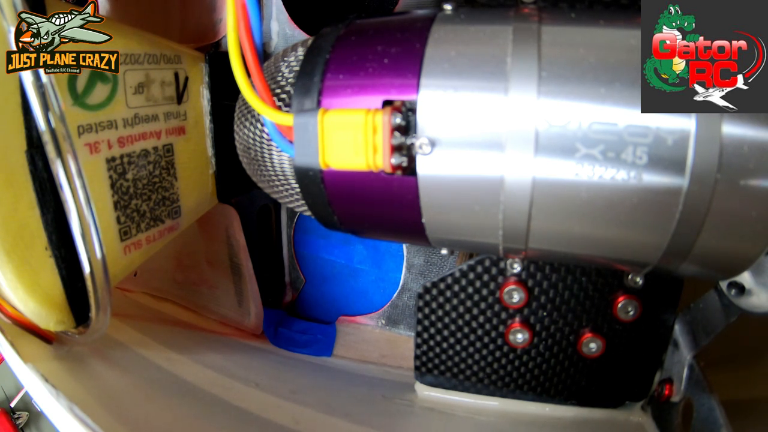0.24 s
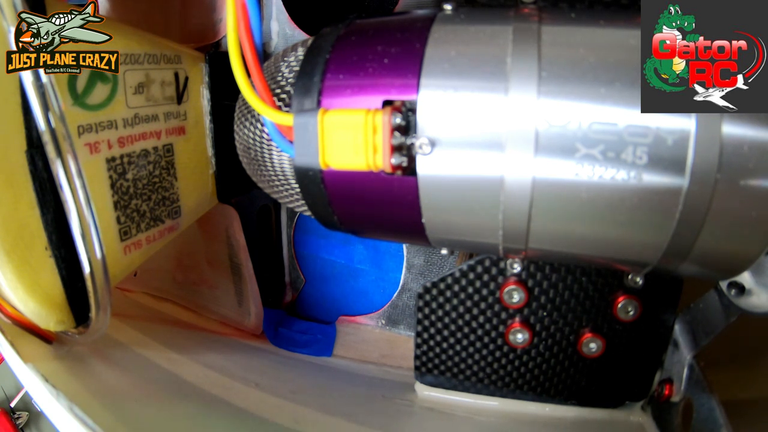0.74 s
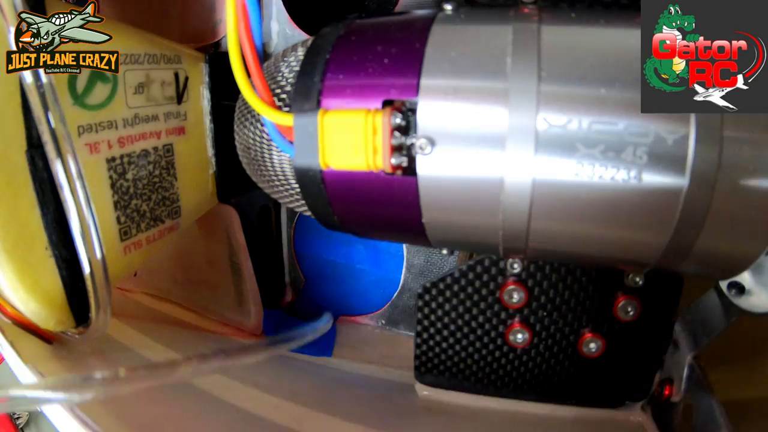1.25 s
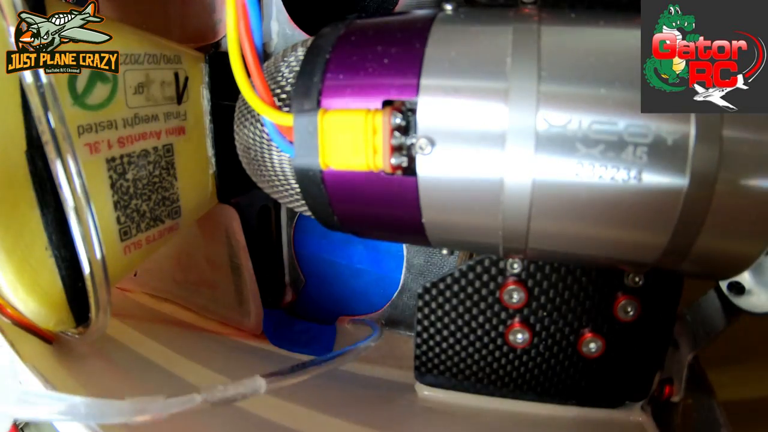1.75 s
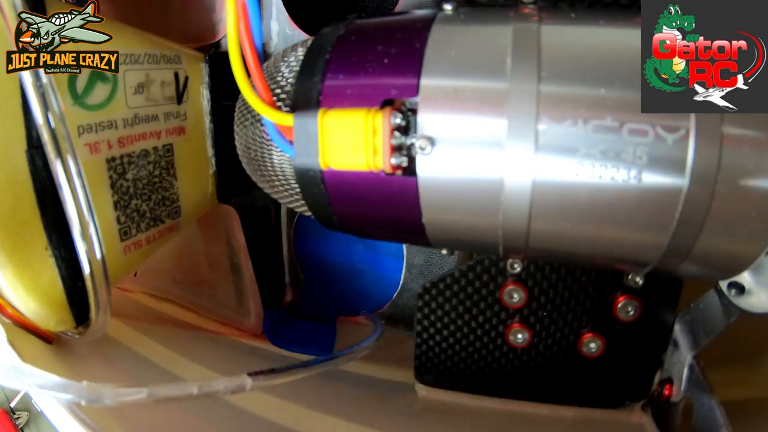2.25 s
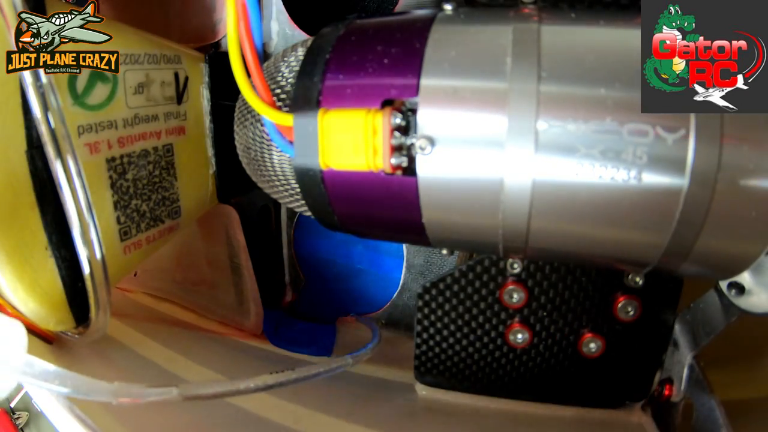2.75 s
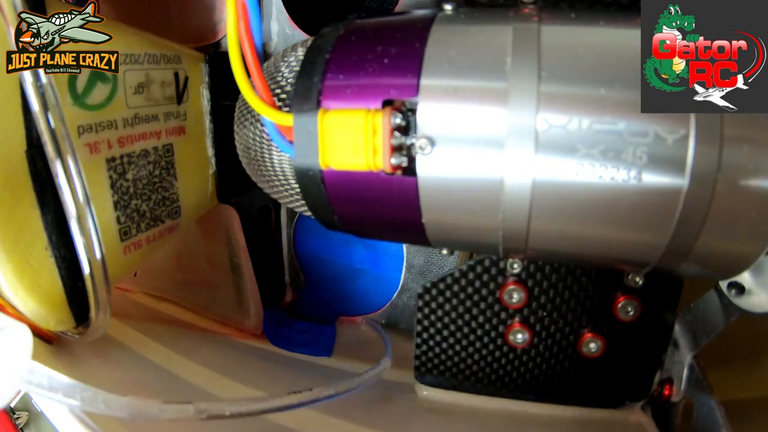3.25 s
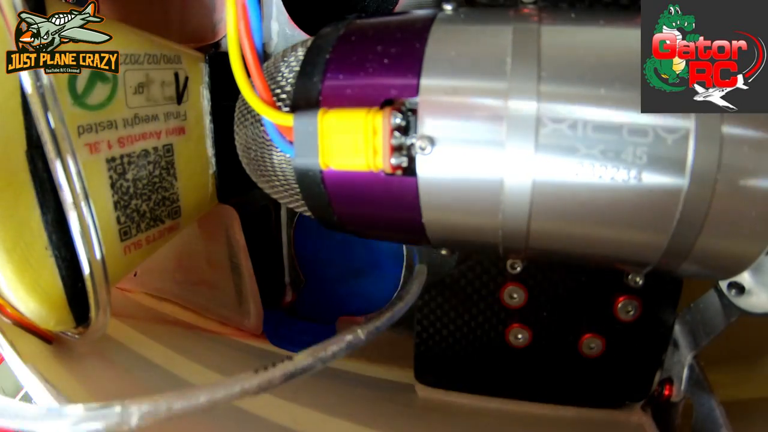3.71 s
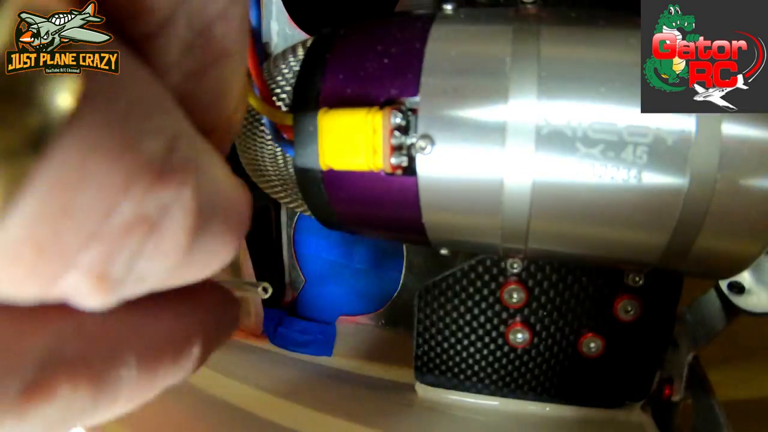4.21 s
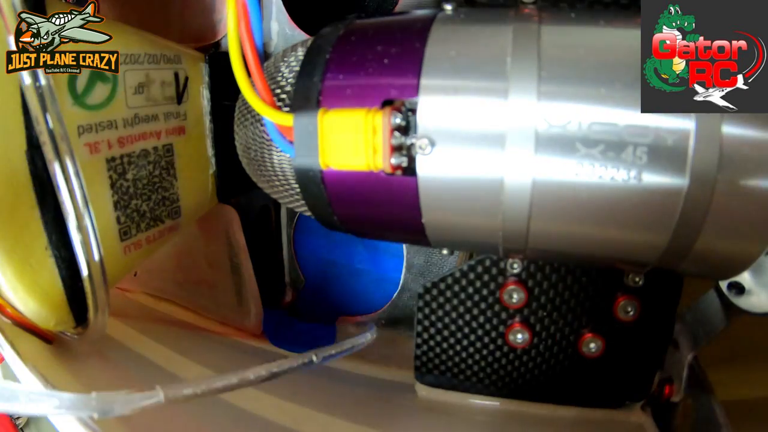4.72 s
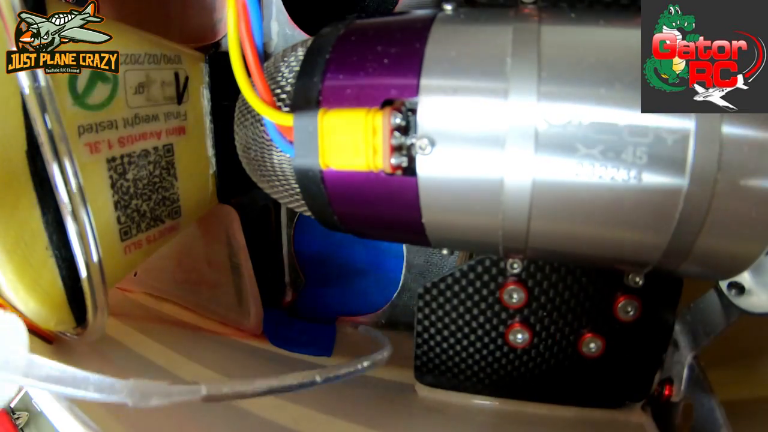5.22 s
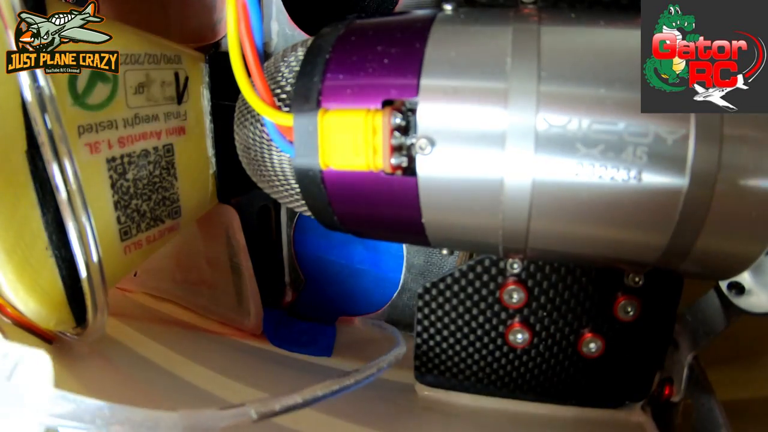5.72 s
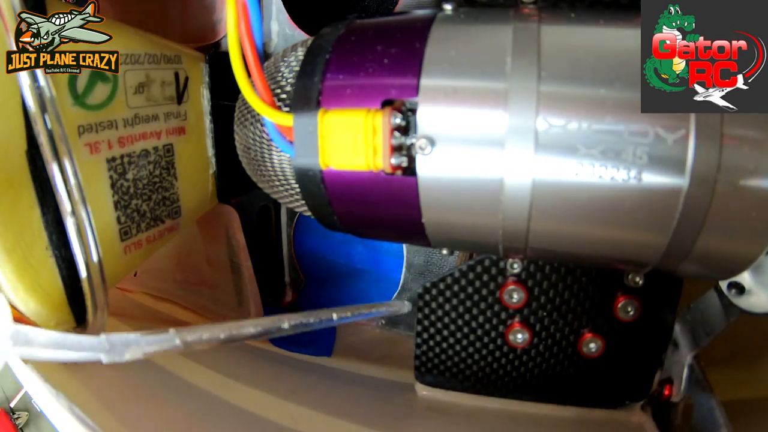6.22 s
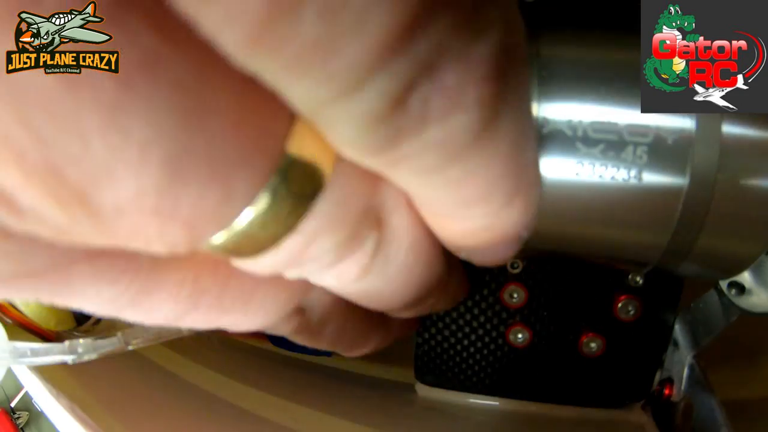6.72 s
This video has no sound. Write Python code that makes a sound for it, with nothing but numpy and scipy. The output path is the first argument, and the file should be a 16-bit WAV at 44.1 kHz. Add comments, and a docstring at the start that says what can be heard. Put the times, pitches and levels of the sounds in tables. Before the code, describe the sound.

Very close inside a hollow model aircraft body, a hand feeds a stiff plastic tube past parts. After a nearly silent first second, sharp clicks and short rattles come in irregular clusters, ringing the thin shell. Brief gritty scrapes join them, with low hand thuds later. A hard knock and dense rattle end it. Faint room hiss and an electric whine swell in the middle and at the end.

```python
"""Tube fed through a hollow model aircraft

Inside the body of a model aircraft, microphones sit close to a stiff plastic tube that a hand feeds through.
The tube slips and ticks over edges: jolts and rattles ring the thin shell and scatter in the hollow.
Skin and tube rub in strokes of tiny catches; the hand bumps the frame in soft thuds of tone and low noise.
Behind them, patchy room noise and a faint electric whine of three tones share one level that rises and falls."""
import sys
import numpy as np
from scipy import signal
from scipy.fft import rfft, irfft, next_fast_len
from scipy.io import wavfile
from scipy.ndimage import uniform_filter1d, map_coordinates

SR = 44100
rng = np.random.default_rng(int(sys.argv[2]) if len(sys.argv) > 2 else 0)


def log_audio(samples):
    """Write samples as a 16-bit WAV file to the path given in sys.argv[1]."""
    # one column per channel
    frames = np.atleast_2d(samples).T
    # limit to full scale, then quantise
    limited = np.clip(frames, -1, 1)
    pcm = np.round(limited * 32767).astype(np.int16)
    wavfile.write(sys.argv[1], SR, pcm)


N = 306936

# background level as heard at the microphones: start_s [s], level_db [dB]
ROOM_LEVEL = [(0.0, -69), (3.97, -63.5), (4.15, -56.5), (4.57, -58), (5.66, -66.5), (6.2, -67),
              (6.96, -55.5)]
# colour of the room noise, mid: frequency_hz [Hz], density_db [dB per Hz, relative]
ROOM_MID_COLOUR = [(30, -43.5), (100, -43.5), (174, -29.5), (290, -18), (350, -25.5), (415, -20.5),
                   (500, -19.5), (590, -16), (900, -12), (1250, -10.5), (1590, -0.5), (2200, -13.5),
                   (3500, -25), (5500, -36.5), (7600, -26), (10000, -34.5), (16000, -38.5)]
# colour of the room noise, side: frequency_hz [Hz], density_db [dB per Hz, relative]
ROOM_SIDE_COLOUR = [(18, -60.5), (30, -38), (295, -17.5), (374, -26), (584, -6.5), (1130, -24), (1540, 7),
                    (4300, -10), (6380, 0), (10200, -6.5), (13000, -12), (16000, -20)]
# tones of the electric whine: pitch_hz [Hz], level_db [dB against the background level]
WHINE_TONES = [(415, -10), (600, -14.5), (1200, 2.5)]
# soft bumps of the hand on the frame: start_s [s], level_db [dB], pitch_hz [Hz]
HAND_BUMPS = [(.469, -56, 453), (0.534, -68, 202), (0.572, -58.5, 734), (0.601, -49.5, 387),
              (.745, -55, 1470), (0.754, -48, 885), (.77, -61, 945), (1.076, -50.5, 1275),
              (1.851, -57.5, 273), (1.937, -50, 298), (3.577, -59, 418), (4.186, -40, 350),
              (4.262, -40.5, 396), (4.384, -38, 425), (4.404, -44.5, 306), (4.834, -41.5, 433),
              (4.953, -43, 439), (5.069, -34, 566), (5.092, -36, 300), (5.133, -39, 416), (5.161, -43, 302),
              (5.862, -58, 220), (5.92, -55, 252), (5.99, -58, 660), (6.192, -60, 980), (6.26, -56, 402),
              (6.272, -51.5, 94), (6.382, -56.5, 230), (6.445, -60, 232), (6.576, -23.5, 890),
              (6.59, -31, 500), (6.672, -34.5, 910), (6.685, -47.5, 298), (6.926, -44.5, 376)]
# strokes of tube and hand: start_s [s], length_s [s], scrape_db [dB], rustle_db [dB], hand_db [dB]
STROKES = [(1.464, 0.051, -56.5, -66, -64.5), (1.841, 0.13, -61.5, -62, -70),
           (2.135, 0.17, -47.5, -66, -61), (2.324, 0.067, -49, -95, -59), (2.773, 0.11, -72, -77, -79),
           (3.155, 0.17, -46, -66.5, -60), (3.524, 0.1, -57.5, -76, -81), (3.959, 0.13, -48.5, -69, -60),
           (4.163, 0.14, -46.5, -63.5, -46.5), (4.339, 0.083, -44.5, -55, -54), (4.482, .22, -66, -71, -63),
           (4.728, 0.27, -70, -75.5, -61.5), (5.05, 0.1, -47.5, -64, -45), (5.187, 0.14, -55.5, -69, -66),
           (5.551, 0.33, -72, -84, -75.5), (6.161, 0.19, -65, -91, -68.5),
           (6.621, 0.17, -41.5, -56.5, -49.5), (6.846, 0.11, -55.5, -79, -59)]
# light contact that never stops: scrape_db, rustle_db, hand_db [dB]
REST_DB = [-74.5, -84.5, -79.5]
# slips of the tube: start_s [s], shell_db [dB], tick_db [dB, treble], length_s [s]
TUBE_SLIPS = [(0.4404, -55.5, -46, 0.0017), (0.9442, -55.5, -55, 0.00058), (1.0245, -47.5, -49, 0.00043),
              (1.3078, -48, -37, 0.00057), (1.3187, -47.5, -39, 0.00039), (1.334, -60, -50, 0.00044),
              (1.344, -58, -39, 0.0005), (1.354, -17.5, -40.5, 0.00056), (1.3624, -50, -49, 0.0014),
              (1.38, -59.5, -52, 0.00046), (1.393, -63, -53, 0.0005), (1.4329, -28, -43, 0.0005),
              (1.4398, -26, -44.5, 0.0009), (1.452, -23, -46, 0.0005), (1.487, -36, -62, 0.0016),
              (1.499, -35, -61, 0.0013), (1.51, -30, -57, 0.00054), (1.519, -28, -45, 0.001),
              (1.524, -34, -51, 0.0021), (1.5363, -19, -45, 0.0006), (1.633, -43, -38, 0.00037),
              (1.702, -49.5, -55, 0.0008), (1.749, -50, -53, 0.0008), (1.801, -40, -62, 0.0007),
              (1.814, -27.5, -50, 0.00092), (1.8185, -22, -39.5, 0.0032), (1.829, -34.5, -53, 0.0013),
              (1.855, -50, -55, 0.0005), (1.866, -47, -57, 0.0009), (1.883, -47.5, -60, 0.00045),
              (1.898, -55, -42, 0.0005), (1.915, -53.5, -56, 0.0007), (1.9213, -58, -45, 0.0023),
              (1.9325, -46, -45, 0.0011), (1.944, -62, -44, 0.0013), (1.986, -65, -42, 0.0016),
              (2.0074, -65, -42.5, 0.00056), (2.068, -74, -50.5, 0.00043), (2.0892, -23, -47, 0.00046),
              (2.1013, -13.5, -40.5, 0.00063), (2.1184, -14, -37.5, 0.0018), (2.1604, -28, -48, 0.0021),
              (2.1876, -28, -63, 0.0021), (2.196, -33, -56, 0.0049), (2.219, -41.5, -61, 0.0028),
              (2.234, -37, -63, 0.002), (2.2587, -38.5, -56, 0.0025), (2.3172, -36, -62, 0.00078),
              (2.3306, -33, -55, 0.0031), (2.3478, -17, -42, 0.00046), (2.372, -19.5, -46, 0.0005),
              (2.4005, -25.5, -56, 0.0005), (2.417, -22.5, -52, 0.00043), (2.4895, -33, -69, 0.001),
              (2.5186, -31.5, -78, 0.0016), (2.5316, -20, -50, 0.00042), (2.5476, -23, -55, 0.00061),
              (2.5547, -27.5, -62, 0.0018), (2.5803, -25.5, -47, 0.0005), (2.593, -26, -82, 0.00043),
              (2.607, -24, -66, 0.00073), (2.6209, -28, -49.5, 0.0005), (2.6443, -37.5, -75, 0.0016),
              (2.7834, -29.5, -66.5, 0.00086), (2.811, -44, -63, 0.0023), (3.1003, -13.5, -32.5, 0.00045),
              (3.1119, -11, -31.5, 0.00048), (3.17, -34, -50, 0.00033), (3.1824, -42, -53.5, 0.0037),
              (3.21, -12.5, -29.5, 0.00045), (3.2182, -9, -33.5, 0.00037), (3.2427, -24, -52, 0.0018),
              (3.25, -37.5, -55, 0.0038), (3.269, -38, -61, 0.0032), (3.306, -39.5, -60, 0.0016),
              (3.3249, -22.5, -57, 0.00031), (3.492, -62, -62, 0.0062), (3.5191, -17.5, -51.5, 0.00052),
              (3.534, -28, -44, 0.00068), (3.602, -60, -61, 0.0024), (3.641, -53, -54, 0.0029),
              (3.6532, -33, -56, 0.0005), (3.6588, -20, -43, 0.0005), (3.6668, -32, -56, 0.0033),
              (3.678, -35, -67, 0.00056), (3.6882, -40, -37, 0.00056), (3.759, -54, -53, 0.00045),
              (3.7682, -54, -57.5, 0.00058), (3.785, -53.5, -53, 0.00094), (3.826, -52, -48.5, 0.00025),
              (3.9397, -16, -36, 0.0011), (3.971, -15.5, -28, 0.00063), (3.9807, -14, -34.5, 0.0014),
              (3.997, -30, -41, 0.00058), (4.0139, -19, -34, 0.0023), (4.051, -41, -66, 0.0051),
              (4.1172, -44, -48, 0.001), (4.196, -33.5, -64, 0.0025), (4.238, -27, -43.5, 0.0017),
              (4.248, -24, -47, 0.0018), (4.266, -38, -68, 0.0049), (4.373, -27, -37, 0.00031),
              (4.391, -29, -39, 0.0033), (4.4, -31, -41, 0.0026), (4.411, -35, -34, 0.0012),
              (4.419, -13.5, -43.5, 0.00059), (4.4243, -16, -38.5, 0.0014), (4.455, -52, -48, 0.0031),
              (4.491, -38, -44, 0.0006), (4.4997, -23, -48, 0.00077), (4.5498, -19, -43, 0.00062),
              (4.5617, -18.5, -46, 0.00075), (4.5726, -26.5, -49, 0.00095), (4.5887, -24, -42, 0.0026),
              (4.5967, -22.5, -42.5, 0.0018), (4.644, -36, -42, 0.0014), (4.6605, -36.5, -44, 0.0005),
              (4.6749, -14, -33, 0.00035), (4.686, -32, -45, 0.0013), (4.7583, -29.5, -63, 0.0036),
              (4.8012, -31.5, -62, 0.0029), (4.817, -25.5, -51, 0.00056), (4.83, -19.5, -42.5, 0.00055),
              (4.843, -24, -46.5, 0.00044), (4.856, -25, -49.5, 0.00056), (4.91, -30, -47, 0.00062),
              (4.916, -29.5, -54, 0.00077), (4.9325, -32, -60, 0.0004), (4.956, -23.5, -41, 0.00046),
              (5.05, -21.5, -42.5, 0.0024), (5.0718, -21, -35.5, 0.00047), (5.1005, -30, -49.5, 0.0011),
              (5.147, -48, -50.5, 0.00046), (5.1539, -13.5, -35.5, 0.0005), (5.1673, -17, -43, 0.0006),
              (5.185, -43, -47.5, 0.0011), (5.239, -42, -78, 0.0013), (5.276, -53, -61, 0.00061),
              (5.3165, -16.5, -39.5, 0.00045), (5.3603, -21, -50, 0.00042), (5.3772, -15.5, -40.5, 0.00052),
              (5.3876, -16, -44, 0.00036), (5.607, -61, -54.5, 0.00057), (5.703, -27.5, -65, 0.00055),
              (5.7154, -26, -46.5, 0.00076), (5.8662, -18, -44, 0.00069), (5.9101, -49.5, -58, 0.0011),
              (6.3579, -36.5, -73, 0.0012), (6.527, -44, -52, 0.00074), (6.581, -21, -37, 0.00024),
              (6.593, -46, -38.5, 0.0013), (6.6512, -35.5, -52, 0.0062), (6.6742, -25, -41, 0.00041),
              (6.6987, -28.5, -44, 0.0012), (6.714, -30, -47, 0.0022), (6.725, -20, -38, 0.0039),
              (6.7357, -24, -36, 0.0015), (6.7443, -36, -45, 0.0016), (6.761, -28, -42, 0.0014),
              (6.777, -23, -36, 0.0013), (6.7837, -26, -39, 0.0026), (6.7993, -20, -39, 0.0039),
              (6.81, -20.5, -34, 0.0038), (6.8622, -19, -39, 0.0017)]
# resonances of the frame: pitch_hz [Hz], width_hz [Hz], level_db [dB, relative]
FRAME_MODES = [(173, 73, -9.5), (275.4, 24, -3), (431.5, 42.6, 2), (605, 71, -2.5), (977, 160, 2)]
# resonances of the shell: pitch_hz [Hz], width_hz [Hz], level_db [dB, relative]
SHELL_MODES = [(1472, 222, -1), (1671, 80.7, 8), (1874.5, 82.5, 4.5), (2290, 144, -2.5)]
# resonances of the edges: pitch_hz [Hz], width_hz [Hz], level_db [dB, relative]
EDGE_MODES = [(2813, 137, 10.5), (3160, 97, 15), (3440, 430, 5), (3998, 235, 10.5), (4484, 87, 6),
              (5044, 234, 4)]
# treble resonances: pitch_hz [Hz], width_hz [Hz], level_db [dB, relative]
TREBLE_MODES = [(5845, 300, -4.5), (6190, 160, 3.5), (7490, 1170, 2), (8910, 970, -1), (10580, 560, -1.5)]
# top treble resonances: pitch_hz [Hz], width_hz [Hz], level_db [dB, relative]
SPARK_MODES = [(10660, 1200, -3), (12500, 720, 2.5), (14100, 2640, -1.5)]
# how the two microphones differ up close:
# frequency_hz [Hz], side_db [dB over mid], phase_rad [rad], share [0-1, part of the side tied to the mid]
MICROPHONE_SIDE = [(100, -4, 3.2, 0.72), (600, 2, 3.4, 0.7), (1150, -4, 1.7, 0.58),
                   (1810, -4.5, 3.88, 0.96), (4000, -8, 3, 0.53), (6500, 2, 2.85, 0.67),
                   (9500, 7.5, 1.8, 0.8), (13000, 8.5, 1.6, .6)]
# spans where the stereo picture folds to mono: start_s [s], end_s [s]
MONO_SPANS = [(2.196, 2.32), (3.158, 3.494), (4.038, 4.25), (4.449, 4.8), (5.199, 5.305), (6.621, 7.14)]

BUMP_PEAK_S = 0.0057  # time from contact to the peak
BUMP_ROUGH, ROUGH_PER_DB = 0.66, 0.19  # roughness (0-1) of a -48.5 dB bump, more for harder bumps
STROKE_RISE_S, STROKE_FALL_S = 0.011, 0.025
HAND_HZ = 920  # soft skin passes little above this
RUB_EDGE_DB, RUB_SPARK_DB = -10.5, -2  # edge under the scrape, top treble under the rustle
FRAME_DB, SPARK_DB = -25, -2  # frame under the shell, top treble against the tick
EDGE_SHARE, EDGE_DB = 0.28, -4  # the edge lies this share of the way from shell to tick, plus an offset
BRIGHTEN_PER_DB = 0.17  # dB moved from treble to top treble per dB of tick over edge
TOP_HZ = 16500  # middle of the upper band limit


def amp(db):
    """Decibels to amplitude."""
    return 10 ** (np.asarray(db) / 20)


def unit(x):
    """Scale to an rms of one."""
    return x / np.sqrt(np.mean(x ** 2) + 1e-20)


def along(points, hz):
    """Read (Hz, value) points along a log frequency axis."""
    f, v = np.transpose(points)
    return np.interp(np.log(hz + 1), np.log(f + 1), v)


def wobble(rate):
    """A smooth random curve with rate knots a second."""
    knots = rng.standard_normal(int(N * rate / SR) + 4)
    return map_coordinates(knots, [np.arange(N) * rate / SR])


def filtered(x, response):
    """Multiply the spectrum of x by a complex response of frequency."""
    m = next_fast_len(N + SR // 2)
    return irfft(rfft(x, m) * response(np.fft.rfftfreq(m, 1 / SR)), m)[..., :N]


def ring(x, modes, skirt_hz):
    """Pass x through resonances, steep outside the skirt; white noise would keep its level."""
    low, high = skirt_hz

    def response(f):
        h = 0
        for k, (pitch, width, db) in enumerate(modes):
            mode = 1j * f * width / (pitch * pitch - f * f + 1j * f * width)
            h = h + (-1) ** k * amp(db) * mode  # neighbours alternate in sign
        h = h * (1j * f / (low + 1j * f)) ** 2 * (high / (high + 1j * f)) ** 2
        return h / np.sqrt(np.mean(np.abs(h) ** 2))
    return filtered(x, response)


def room_noise():
    """Mid and side of coloured noise whose level varies in patches of time and frequency."""
    z = signal.stft(rng.standard_normal((2, N)), nperseg=512)[2]
    field = uniform_filter1d(rng.standard_normal(z.shape[1:]), 6, 0)
    patches = amp(3.0 * unit(uniform_filter1d(field, 10, 1)))
    pair = signal.istft(z * patches, nperseg=512)[1][:, :N]
    mid, side = filtered(pair, lambda hz: amp([along(ROOM_MID_COLOUR, hz), along(ROOM_SIDE_COLOUR, hz)]))
    return np.array([amp(2.5) * unit(mid), amp(-3.0) * unit(side)])


def electric_whine():
    """Mid and side of fixed sine tones that waver slightly in level, almost all in the mid."""
    t = np.arange(N) / SR
    tones = sum(amp(db) * np.sin(2 * np.pi * hz * t) for hz, db in WHINE_TONES)
    whine = amp(1.2 * wobble(6)) * tones
    return np.array([whine, amp(-33.5) * whine])


def background():
    """Room noise and whine share one level curve, so they rise and fall together."""
    start, level_db = np.transpose(ROOM_LEVEL)
    level = amp(np.interp(np.arange(N) / SR, start, level_db))
    return level * (room_noise() + electric_whine())


def hand_bumps():
    """Soft flesh gives a few cycles with a round start; rough contact spreads them into a lump of low noise."""
    out, t = np.zeros((2, N + SR)), np.arange(SR // 8) / SR
    f, u = np.fft.rfftfreq(len(t), 1 / SR), t / BUMP_PEAK_S
    swell = u * np.exp(1 - u)
    for start, db, hz in HAND_BUMPS:
        rough = np.clip(BUMP_ROUGH + ROUGH_PER_DB * (db + 48.5), 0, 1)
        colour = (f / (0.23 * hz + f)) ** 3 / (1 + (f / (1.4 * hz)) ** 3)
        lump = unit(irfft(rfft(rng.standard_normal((2, len(t)))) * colour, len(t)))
        tone = np.sin(2 * np.pi * hz * t)
        thud = np.sqrt(1 - rough ** 2) * tone + 0.76 * rough * lump
        out[:, round(start * SR):][:, :len(t)] += amp(db) * swell * thud
    return out[:, :N]


def rubbing():
    """Dense tiny catches of tube and skin, clumped in time; each stroke rises, holds and fades."""
    t, (start, length, *levels_db) = np.arange(N) / SR, np.transpose(STROKES)
    since = t - start[:, None]
    rise = np.clip(since / STROKE_RISE_S, 0, 1)
    fall = np.exp(-np.maximum(since - length[:, None], 0) / STROKE_FALL_S)
    scrape, rustle, hand = amp(levels_db) @ (rise * fall) + amp(REST_DB)[:, None]

    clump = wobble(60)  # shared by scrape and rustle
    catches = unit(rng.standard_normal((2, N)) * amp(5.2 * clump + 4.9 * wobble(470)))
    crackle = unit(rng.standard_normal((2, N)) * amp(4.0 * clump + 8.9 * wobble(160)))
    skin = unit(rng.standard_normal((2, N)) * amp(5 * wobble(45)))
    press = filtered(skin, lambda hz: 1 / (1 + 1j * hz / HAND_HZ) ** 2)

    on_shell, on_treble = scrape * catches, rustle * crackle
    on_edge, on_spark = amp(RUB_EDGE_DB) * on_shell, amp(RUB_SPARK_DB) * on_treble
    return np.array([on_shell, on_edge, on_treble, hand * press, on_spark])


def slip_burst(length):
    """A sharp jolt and a short rattle for each part; longer slips rattle more, and the treble dies first."""
    t = np.arange(SR // 20) / SR
    life = length * np.array([.9, .9, .7, 1.3, .7])[:, None, None]  # shell, edge, treble, frame, top treble
    burst = rng.standard_normal((2, len(t))) * np.sqrt(t / life) * np.exp(-t / life)
    burst = burst / np.linalg.norm(burst, axis=-1, keepdims=True)
    burst[..., 0] += 0.00057 / length  # the jolt
    burst = burst / np.linalg.norm(burst, axis=-1, keepdims=True)
    return burst * np.sqrt((length + 0.0011) * SR)


def tube_slips():
    """Each slip of the tube strikes shell, edge, treble, frame and top treble at once."""
    force = np.zeros((5, 2, N + SR))
    for start, shell_db, tick_db, length in TUBE_SLIPS:
        burst = slip_burst(np.clip(length, .0003, .02))
        edge_db = shell_db + EDGE_SHARE * (tick_db - shell_db) + EDGE_DB
        bright_db = BRIGHTEN_PER_DB * (tick_db - edge_db + 5)  # ticks that spare the edge are brightest
        levels = amp([shell_db, edge_db, tick_db - bright_db, shell_db + FRAME_DB,
                      tick_db + SPARK_DB + bright_db])
        force[:, :, round(start * SR):][..., :burst.shape[-1]] += levels[:, None, None] * burst
    return force[..., :N]


def airframe(force):
    """The forces ring the parts of the airframe, and the sound scatters briefly inside the hollow."""
    shell, edge, treble, frame, spark = force
    pair = ring(shell, SHELL_MODES, (900, 4000)) + ring(edge, EDGE_MODES, (1800, 8000))
    pair = pair + ring(treble, TREBLE_MODES, (3500, 14000)) + ring(frame, FRAME_MODES, (40, 2500))
    pair = pair + ring(spark, SPARK_MODES, (6000, 18000))
    t = np.arange(SR // 16) / SR
    tail = rng.standard_normal((2, len(t))) * amp(-60 * t / 0.023)  # falls 60 dB in 23 ms
    scattered = signal.fftconvolve(pair, tail / np.linalg.norm(tail[0]), axes=1)[:, :N]
    return pair + amp(-3.5) * filtered(scattered, lambda hz: hz / (hz + 2500))  # less scatter in the lows


def microphones(pair):
    """Mid and side of a near source: the right port is closer, and in the treble the side outweighs the mid."""
    hz_points, *cols = np.transpose(MICROPHONE_SIDE)

    def response(f):
        side_db, phase, share = (along(np.transpose([hz_points, c]), f) for c in cols)
        share = np.clip(share, 0, 1)
        return amp(side_db) * [share * np.exp(1j * phase), np.sqrt(1 - share ** 2)]
    return np.array([pair[0], filtered(pair, response).sum(axis=0)])


def scene():
    """Left and right inside the hollow: the near sources over the background."""
    near = hand_bumps() + airframe(rubbing() + tube_slips())
    mid, side = background() + microphones(near)
    return np.array([mid + side, mid - side])


def record(dry):
    """The picture fades to mono now and then; nothing is kept above the band limit."""
    t = np.arange(N) / SR
    fold = sum(np.clip(np.minimum(t - start, end - t) / 0.05 + .5, 0, 1) for start, end in MONO_SPANS)
    width = (1 - np.minimum(fold, 1)) ** 2
    mid, side = (dry[0] + dry[1]) / 2, (dry[0] - dry[1]) / 2 * width
    pair = np.array([mid + side, mid - side])
    return filtered(pair, lambda hz: np.clip((TOP_HZ + 500 - hz) / 1000, 0, 1) ** 2)


dry = scene()
out = record(dry)
log_audio(out)
```